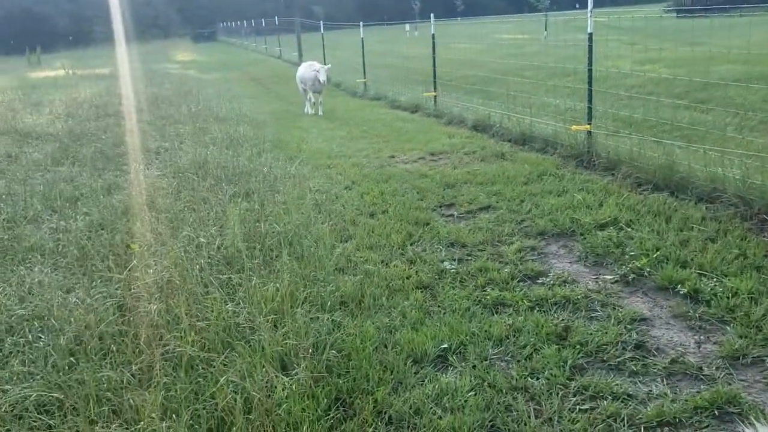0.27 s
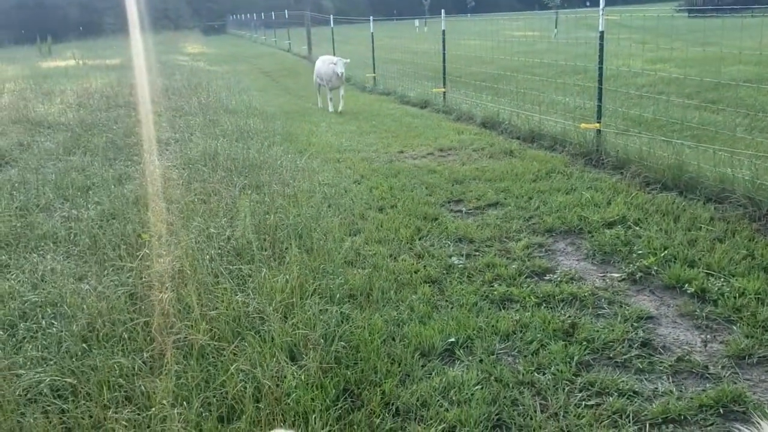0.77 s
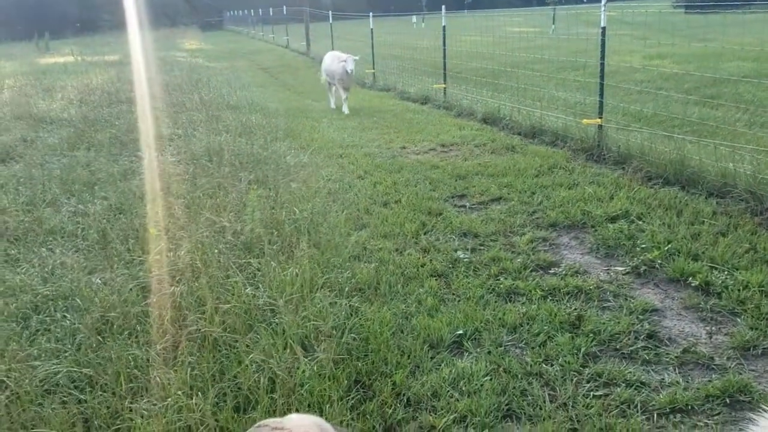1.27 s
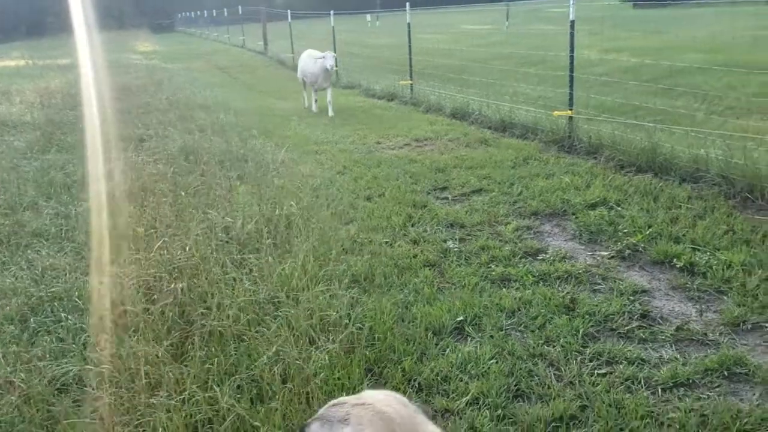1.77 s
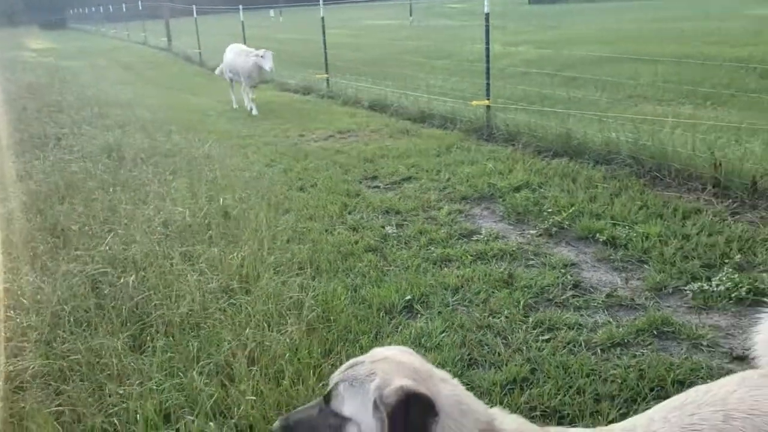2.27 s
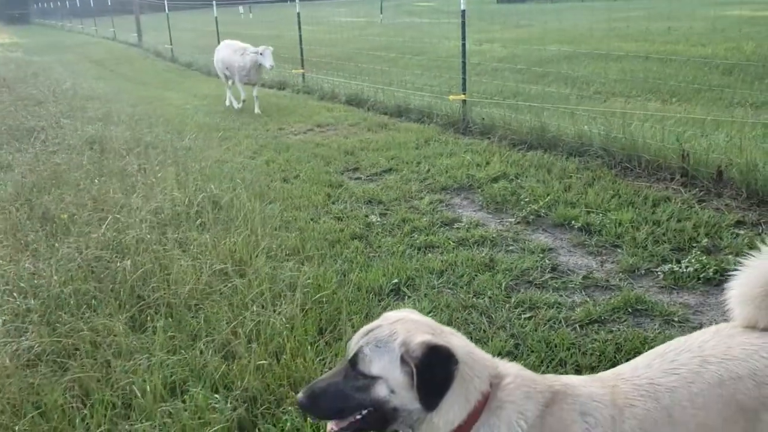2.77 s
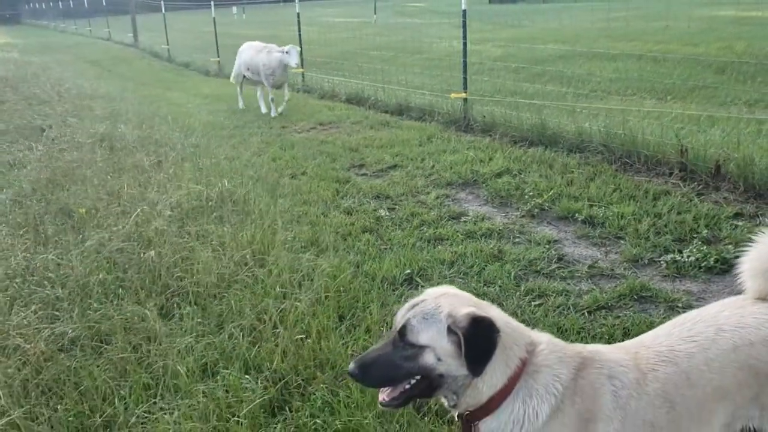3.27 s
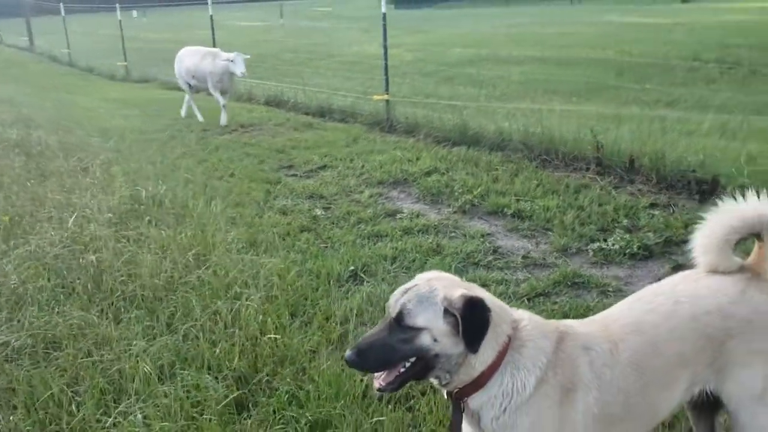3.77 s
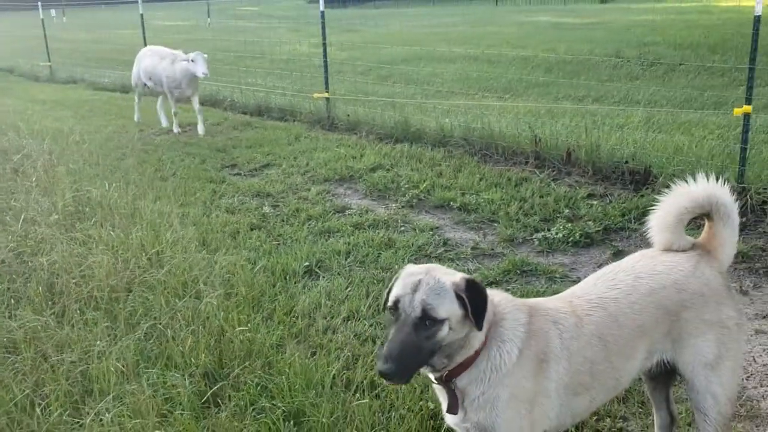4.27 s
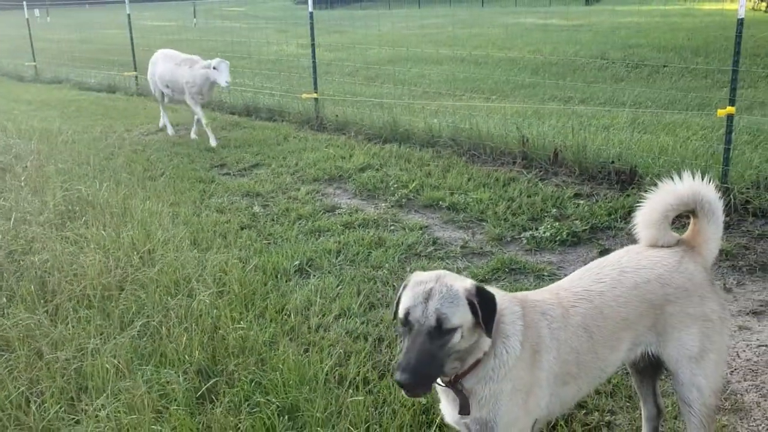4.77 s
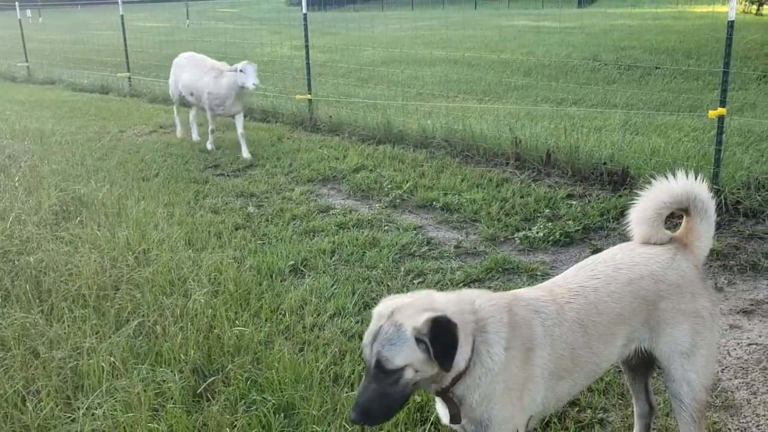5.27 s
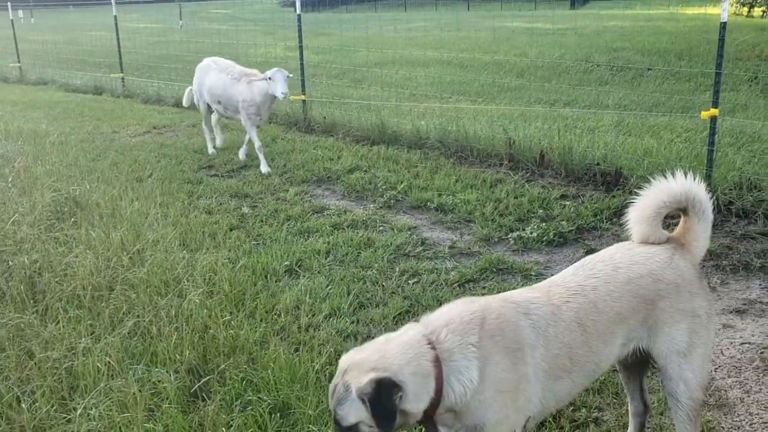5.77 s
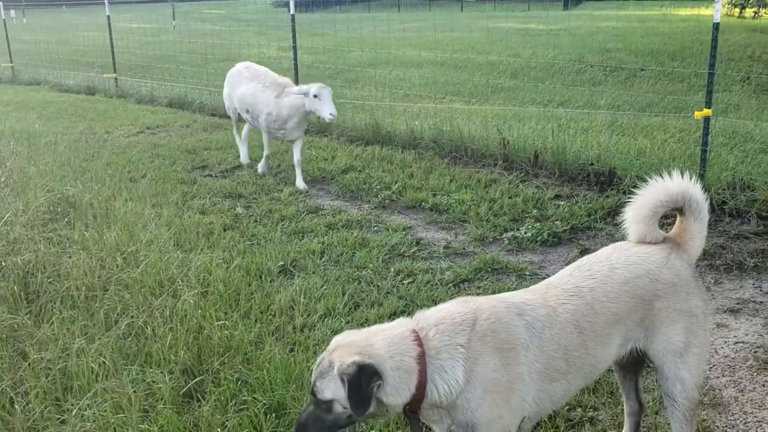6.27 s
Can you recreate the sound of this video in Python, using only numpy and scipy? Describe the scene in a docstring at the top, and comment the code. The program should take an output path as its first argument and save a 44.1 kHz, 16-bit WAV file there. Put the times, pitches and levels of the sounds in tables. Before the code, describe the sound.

An animal's quick steps crunch through damp pasture grass close on the right while wind rumbles unevenly on a hand-held microphone and insects hiss faintly.

```python
"""A pasture on a summer day. An animal close on the right crunches through damp grass, nearly three steps
a second: breaking stems ring, thud and crackle; long stems swish, wet ones squeak, dry blades snap.
Eddies of wind and low thumps of gusts and the grip rumble unevenly on the two ports of a hand-held
microphone. Insects scrape resonant wings, small birds chirp in gliding tones, and filtered noise makes the
rustle, the hiss of an insect chorus and the murmur of a far engine, whose wavering tones hum."""
import sys
import numpy as np
from scipy import signal
from scipy.fft import rfft, irfft, next_fast_len
from scipy.io import wavfile
from scipy.ndimage import uniform_filter1d

SR = 44100
rng = np.random.default_rng(int(sys.argv[2]) if len(sys.argv) > 2 else 0)


def pcm_store(signal):
    """Save signal as 16-bit PCM."""
    levels = np.round(np.clip(np.atleast_2d(signal), -1, 1) * 32767)
    wavfile.write(sys.argv[1], SR, levels.astype(np.int16).T)


N = 287091
T = np.arange(N) / SR

# In the tables, a level is relative where its function adds a trim; balance is left minus right.
# Loud crunches: (time [s], relative ring level [dB], ring frequency [Hz], relative thud level [dB],
# nominal length [s])
LOUD_CRUNCHES = [(0.026, -47, 600, -56, 0.0061), (0.119, -47, 3770, -57, 0.014),
                 (0.142, -51, 2070, -62, 0.019), (0.351, -51, 1500, -70, 0.0082),
                 (0.378, -46, 630, -61, .016), (0.384, -46.5, 2420, -68, 0.011),
                 (0.431, -51, 1890, -66, .02), (0.64, -54, 2050, -72, .009),
                 (0.465, -48, 1870, -69, 0.0076), (0.477, -44, 644, -67, 0.0084),
                 (0.509, -51, 651, -54, 0.014), (0.688, -44.5, 2130, -53, 0.014),
                 (0.708, -43, 1830, -53.5, .009), (0.755, -48, 586, -56, .014),
                 (0.816, -38.5, 583, -57, 0.011), (0.83, -55, 4400, -72, .008),
                 (1.048, -45, 2260, -73, 0.016), (1.072, -42, 1600, -48.5, .012),
                 (1.095, -54, 1950, -68, .012), (1.122, -46, 1210, -63, .015),
                 (1.163, -45.5, 2140, -70, 0.0063), (1.194, -44.5, 620, -63, 0.0069),
                 (1.429, -50.5, 2280, -58, 0.01), (1.449, -41, 714, -45, 0.0079),
                 (1.497, -50, 703, -65, 0.023), (1.513, -47, 2120, -73, .012),
                 (1.557, -48, 2320, -58, 0.018), (1.808, -46, 2130, -54.5, 0.012),
                 (1.826, -52, 690, -68, 0.013), (1.986, -54, 2700, -54, 0.012),
                 (2.124, -55, 1930, -71, .013), (2.17, -57.5, 4070, -64, .008),
                 (2.198, -45, 750, -64, 0.0085), (2.222, -43, 596, -67, 0.0055),
                 (2.596, -53, 2620, -75, 0.0097), (3.176, -44, 3020, -56, .01),
                 (3.416, -47.5, 1960, -61, 0.029), (3.462, -50, 2150, -72, .006),
                 (3.54, -46.5, 3400, -52.5, 0.011), (3.56, -51, 710, -55.5, 0.016),
                 (3.780, -38.5, 1850, -60, 0.016), (3.804, -42, 1940, -66, .009),
                 (3.837, -48, 1880, -67, 0.025), (3.867, -45, 2990, -60, 0.01),
                 (3.923, -47.5, 1740, -57.5, 0.011), (4.12, -41, 1920, -55.5, 0.011),
                 (4.127, -44, 3700, -61, .008), (4.248, -50.5, 1920, -62, 0.009),
                 (4.456, -49.5, 1730, -70, 0.025), (4.789, -46.5, 1880, -60, 0.018),
                 (4.802, -53, 1050, -68, .025), (4.847, -43, 3190, -66, 0.018),
                 (5.198, -49, 2120, -72, 0.015), (5.212, -44, 1760, -55, 0.0098),
                 (5.289, -46.5, 1850, -67, 0.014), (5.353, -52.5, 805, -64, 0.013),
                 (5.544, -45.5, 2120, -76, .019), (5.679, -47, 3100, -56, .018),
                 (5.908, -43, 2140, -73, .014), (5.932, -45, 1880, -59.5, .012),
                 (6.056, -52, 1970, -68, .014), (6.258, -46, 1950, -59, 0.0074)]
# Two spells of even walking: (first step [s], last step [s], step period [s])
WALKING_SPELLS = [(0.0, 1.82, .364), (3.41, 6.27, .356)]
# Extra delay of the crunches at the left port: (time [s], delay [samples])
LEFT_PORT_DELAY = [(0, 21), (1.9, 20), (4, 17), (6.5, 16)]
# Spectrum of crackling fibres: (frequency [Hz], relative level per Hz [dB])
CRACKLE_SPECTRUM = [(900, 4), (1500, 0), (2100, 1), (2600, -5), (3300, 6.5), (4500, -2), (7000, -6.5),
                    (10000, -20), (15000, -11)]
# Spectrum of the turf's thud: (frequency [Hz], relative level per Hz [dB])
THUD_SPECTRUM = [(250, -6), (480, 2.5), (700, -1.5), (1300, 4), (2000, -13.5), (3500, -22)]
# Wet stems squeaking: (time [s], level [dB], frequency [Hz], nominal length [s])
STEM_SQUEAKS = [(3.788, -64.5, 5490, 0.0064), (3.83, -70, 5400, 0.0087)]
# Long grass swishing: (time [s], length [s], relative level [dB], balance [dB])
GRASS_SWISHES = [(1.039, 0.28, -62, 1), (1.411, 0.21, -65.5, 2), (2.174, 0.4, -64.5, 1),
                 (3.052, .36, -55, -2), (3.42, 0.27, -66.5, 3)]
# Spectrum of a swish: (frequency [Hz], relative level per Hz [dB])
SWISH_SPECTRUM = [(300, 12), (550, 9.5), (1200, 4), (2200, 1.5), (3300, 2), (5000, -5.5), (7500, -5.5),
                  (10000, -10), (13000, -1), (15500, 4.5)]
# Dry blades snapping: (time [s], relative level [dB], nominal length [s], balance [dB])
BLADE_SNAPS = [(0.4993, -43, 0.01, 7.5), (0.513, -42, 0.01, 8), (0.758, -36, 0.0089, 8),
               (0.7774, -40, 0.01, 8), (2.3087, -43, 0.006, 3.5), (4.32, -41, 0.01, 1),
               (4.984, -43, 0.005, 5.5), (5.212, -41, 0.01, 4), (5.446, -41, 0.01, -1),
               (5.68, -38, 0.01, 3), (6.082, -42, 0.01, 9), (6.289, -29, 0.0036, -1)]
# Spectrum of a snap: (frequency [Hz], relative level per Hz [dB])
SNAP_SPECTRUM = [(5500, -13), (8000, -8), (11500, 5), (15500, 4.5)]
# Wind on the ports: (time [s], relative level [dB], balance [dB])
WIND_GUSTS = [(0.0, -36.5, 14), (0.11, -31, -11), (0.18, -50, -1), (0.27, -32.5, -10), (0.33, -54, 0),
              (0.36, -38, 14), (0.45, -50.5, 10), (1.32, -55, 0), (1.43, -41, 14), (1.74, -33, 20),
              (1.81, -42.5, -7), (1.9, -35.5, 14), (1.98, -38, -1.5), (2.05, -31.5, 16), (2.17, -32, 6),
              (2.23, -31.5, 15.0), (2.37, -35, -4.5), (2.5, -38, 9), (2.61, -33, -5), (3.24, -50, 12),
              (3.46, -56.5, 5), (3.62, -40.5, 20.0), (3.73, -55.5, -2.5), (3.99, -39, 10.5),
              (4.19, -37.5, 2), (4.22, -54, 4), (4.33, -44.5, -16.0), (4.41, -43.5, 5), (4.5, -53, -6.5),
              (4.57, -35, 22.5), (4.71, -40, -1), (4.86, -41.5, 16), (4.97, -35, -5), (5.0, -56, -4.0),
              (5.35, -48.5, 9), (5.42, -31, 30), (5.49, -40, 9.0), (5.6, -35.5, 18.0), (5.75, -27.5, 6),
              (5.82, -27.5, 14), (5.91, -39.5, 0), (6.09, -41, 11.0), (6.46, -37, 8), (6.51, -53, -6)]
# Spectrum of the wind's eddies: (frequency [Hz], relative level per Hz [dB])
EDDY_SPECTRUM = [(20, -26.5), (48, 4), (72, 0.5), (122, -12), (175, -21.5), (240, -30.5), (300, -41.5),
                 (450, -51)]
# Low thumps of wind gusts and the grip: (time [s], relative level [dB], frequency [Hz], balance [dB])
LOW_THUMPS = [(0.074, -26.5, 64.3, -18), (0.252, -29.5, 77.7, -11), (0.361, -26.5, 61.3, 20),
              (1.665, -30, 60, 16), (2.01, -22, 66.6, 23), (2.101, -25.5, 90.3, 30), (2.2, -24.5, 58, 15),
              (2.374, -22, 86.5, -18), (2.84, -27.5, 68.5, 2), (3.619, -30.5, 60.3, 29),
              (4.563, -23, 61.8, 21.5), (4.947, -32, 64, 0), (5.636, -21.5, 66, 18), (5.763, -19, 65, 23),
              (6.131, -29, 73.3, 13)]
# Bird notes: (time [s], length [s], start frequency [Hz], end frequency [Hz], relative level [dB],
# overtone against fundamental [dB])
BIRD_NOTES = [(0.449, 0.13, 2600, 2960, -59.5, -40), (0.669, 0.03, 5730, 7600, -50.5, -24),
              (0.803, .018, 6450, 6200, -54, -30), (0.91, 0.14, 2500, 2900, -60.5, -40),
              (1.071, 0.017, 7100, 6500, -46.5, -30), (1.372, 0.14, 2510, 2940, -62, -45),
              (1.817, .06, 6750, 6950, -59, -5), (1.862, .055, 7000, 7040, -56, -14),
              (5.468, .06, 6800, 7000, -64, -8), (5.532, 0.053, 6900, 7250, -61, -5),
              (6.438, 0.034, 2560, 2570, -61.5, -40)]
# Soft rustle of the field: (time [s], level [dB])
RUSTLE_LEVEL = [(0, -59), (0.3, -62.5), (0.7, -60.5), (1.2, -58.5), (2.2, -60.5), (2.9, -61), (3.3, -59),
                (4.0, -59), (4.35, -62.5), (6.5, -61.5)]
# Spectrum of the rustle: (frequency [Hz], relative level per Hz [dB])
RUSTLE_SPECTRUM = [(300, 0.5), (500, -0.5), (800, -10.5), (1000, -1), (1400, -4), (2000, -0.5),
                   (2800, -1.5), (4000, -2), (5000, -6.5)]
# Spectrum of the insect chorus: (frequency [Hz], relative level per Hz [dB])
CHORUS_SPECTRUM = [(4300, -49), (4970, -9.5), (5500, -3.5), (6010, 0.5), (6850, -8), (7340, -7),
                   (8400, -7.5), (8860, -17.5), (9440, -17), (12900, -11.5), (14800, -8.5), (15800, -10)]
# Balance of rustle and chorus: (frequency [Hz], balance [dB])
BACKGROUND_BALANCE = [(300, 7.5), (1300, 0), (2400, -3.5), (4400, -2.5), (6000, 4), (8200, 4.5),
                      (10000, 1.5), (12000, 1.5), (15000, 12)]
# A far engine growing fainter overall: (time [s], relative level [dB])
ENGINE_LEVEL = [(0, 2), (1.3, 2.5), (3.3, -1), (4.6, -6), (6.5, -5.5)]
# Tones of the engine's hum: (frequency [Hz], relative level [dB])
ENGINE_TONES = [(64.6, -51), (113.0, -55.5)]
# Spectrum of the engine's murmur: (frequency [Hz], relative level per Hz [dB])
MURMUR_SPECTRUM = [(35, 4.5), (65, 0), (120, -2), (170, -12.5), (240, -12), (420, -17.5), (600, -28),
                   (750, -28), (1000, -29)]

# Relative crackle level at a ring of -45 dB, dB gained per dB of ring, and fade as the animal walks on
CRACKLE_DB, CRACKLE_GROWTH, CRACKLE_FADE_DB_PER_S = -53, 0.11, 0.76
# Faint crunches: time a foot bears down, relative ring level and its spread, thud and crackle against it
STANCE_S, FAINT_DB, FAINT_SPREAD_DB, FAINT_THUD_DB, FAINT_CRACKLE_DB = 0.14, -58, 1.5, -8, -1.5
FAINT_HZ, FAINT_SPREAD_OCTAVES, FAINT_S = 1920, 0.476, 0.013
SCATTER_DB = -7  # gain of the sound scattered by the grass
WIND_TRIM_DB, FLUTTER_DB, FLUTTER_PER_S = 2.5, 2.5, 20  # flutter: spread and changes per second
CHORUS_DB = -58.5
# Katydid: first buzz, time to the next, shortening of each interval, length of a buzz
BUZZ_FIRST_S, BUZZ_PERIOD_S, BUZZ_HASTE_S, BUZZ_S = 0.254, 0.388, 0.0035, 0.13
BUZZ_DB, BUZZ_LOUDEST_S, BUZZ_FADE_DB_PER_S = -71.5, 3.5, 1.4
TRILL_DEPTH = 1.2  # exponent of the trill's wing strokes
TOP_HZ = 15800


def undb(db):
    """Amplitude gain is ten to the power of decibels over twenty."""
    return 10 ** (np.asarray(db) / 20)


def unit(x):
    """Dividing by the root mean square sets the mean power to 1."""
    return x / np.sqrt(np.mean(x ** 2) + 1e-24)


def curves(table):
    """Linear interpolation reads each column of a timed table sample by sample."""
    s, *columns = np.transpose(table)
    return [np.interp(T, s, column) for column in columns]


def sides(balance_db):
    """A level difference places a sound: left and right gains with a mean power of 1."""
    gains = undb(np.array([balance_db, -balance_db]).reshape(2, -1) / 2)
    return gains / np.sqrt(np.mean(gains ** 2, axis=0))


def along(points, f):
    """Spectra are interpolated on a logarithmic frequency axis."""
    hz, value = np.transpose(points)
    return np.interp(np.log(f + 1), np.log(hz), value)


def colour(x, points, balance=None):
    """Linear filtering multiplies the spectrum; it falls steeply beyond the end points, at rms 1."""
    size = next_fast_len(x.shape[-1])
    f = np.fft.rfftfreq(size, 1 / SR)
    low_skirt = np.minimum(f / points[0][0], 1) ** 4
    high_skirt = np.minimum(points[-1][0] / (f + 1), 1) ** 8
    gain = undb(along(points, f)) * low_skirt * high_skirt
    if balance is not None:
        gain = gain * sides(along(balance, f))
    return unit(irfft(rfft(x, size) * gain, size)[..., :x.shape[-1]])


def resonate(x, hz, q):
    """A single resonance selects a band as narrow as its quality factor is high, at rms 1."""
    b, a = signal.iirpeak(min(hz, 0.45 * SR), max(q, 1), SR)
    return unit(signal.lfilter(b, a, x))


def walk(rate):
    """Smoothed random steps make a slow fluctuation with a spread near 1."""
    hold = int(SR / rate)
    held = np.repeat(rng.standard_normal(N // hold + 1), hold)
    return unit(uniform_filter1d(held, hold)[:N])


def add(out, s, x):
    """Superposition: sounds sum, each from its own starting time."""
    i = max(int(s * SR), 0)
    out[..., i:i + x.shape[-1]] += x[..., :max(N - i, 0)]


def fractures(length, share, size=4096):
    """Fracture noise: many tiny breaks, strong in a share of the samples, build up and die away."""
    u = np.arange(size) / SR / max(length, 0.001)
    breaks = rng.standard_normal(size) * (0.1 + (rng.random(size) < share))
    return breaks * u ** 0.5 * np.exp(-u ** 2)


def crunch(ring_db, hz, thud_db, crackle_db, length):
    """Fracture excites three responses: the damp tuft rings, the turf thuds, the fibres crackle."""
    ring = resonate(resonate(fractures(length * 0.75, 0.045), hz, 9.1), hz, 1.4)
    thud = colour(fractures(length * 1.14, 0.055), THUD_SPECTRUM)
    crackle = colour(fractures(length * 1.53, 0.016), CRACKLE_SPECTRUM)
    return undb(ring_db - 16.0) * ring + undb(thud_db - 6.5) * thud + undb(crackle_db - 10.5) * crackle


def loud_crunches():
    """Crackle grows with the ring and fades as the animal walks on."""
    for s, ring_db, hz, thud_db, length in LOUD_CRUNCHES:
        crackle_db = CRACKLE_DB + CRACKLE_GROWTH * (ring_db + 45) - CRACKLE_FADE_DB_PER_S * s
        yield s, ring_db, hz, thud_db, crackle_db, length


def faint_crunches(count):
    """Progressive failure: each footfall crushes a few more stems at chance moments as it bears down."""
    for first, last, period in WALKING_SPELLS:
        for step in np.arange(first, last + period / 2, period):
            for k in range(count):
                late = (k + rng.random()) / count * STANCE_S
                strength, pitch = rng.standard_normal(2)
                db = FAINT_DB + FAINT_SPREAD_DB * strength
                hz = FAINT_HZ * 2 ** (FAINT_SPREAD_OCTAVES * pitch)
                yield step + late, db, hz, db + FAINT_THUD_DB, db + FAINT_CRACKLE_DB, FAINT_S


def steps():
    """Time of arrival gives direction: the right port leads; the grass scatters sound to both."""
    direct = np.zeros((2, N))
    delay_s, delay_samples = np.transpose(LEFT_PORT_DELAY)
    for s, *settings in [*loud_crunches(), *faint_crunches(count=3)]:
        x = crunch(*settings)
        left_delay = np.interp(s, delay_s, delay_samples) / SR
        add(direct[0], s + left_delay, x * undb(2.0))
        add(direct[1], s, x)
    t = np.arange(SR // 5) / SR
    scatter = rng.standard_normal((2, len(t))) * np.exp(-t / 0.028)
    scatter /= np.sqrt(np.sum(scatter ** 2, axis=1, keepdims=True))  # unit energy
    return direct + undb(SCATTER_DB) * signal.fftconvolve(direct, scatter, axes=1)[:, :N]


def squeaks():
    """Friction excites resonance: wet stems slip on each other and ring high for a moment."""
    out = np.zeros((2, N))
    for s, db, hz, length in STEM_SQUEAKS:
        slip = fractures(length, 0.11)
        add(out, s, undb(db) * resonate(resonate(slip, hz, 13), hz, 9.2))
    return out


def swishes():
    """Friction noise: many sliding stems make a grainy brush that swells, eases and differs by port."""
    out = np.zeros((2, N))
    for s, length, db, balance_db in GRASS_SWISHES:
        size = int(length * SR)
        grain_db = 2.5 * rng.standard_normal((2, size)) + 1.9 * walk(64.7)[:size]
        rub = rng.standard_normal((2, size)) * undb(grain_db)
        pressure = np.interp(np.linspace(0, 1, size), [0, 0.25, 0.7, 1], [0.13, 0.95, 0.69, 0.079])
        add(out, s, colour(rub, SWISH_SPECTRUM) * pressure * undb(db + 6.5) * sides(balance_db))
    return out


def blades():
    """Brittle fracture is brief and bright: dry blades snap with a thin tick."""
    out = np.zeros((2, N))
    for s, db, length, balance_db in BLADE_SNAPS:
        breaks = np.array([fractures(length * 1.4, 0.048) for _ in range(2)])
        add(out, s, colour(breaks, SNAP_SPECTRUM) * undb(db - 28.0) * sides(balance_db))
    return out


def wind():
    """Turbulent pressure: eddies buffet each port on its own; gusts set their strength and flutter."""
    gust_db, balance_db = curves(WIND_GUSTS)
    eddies = colour(rng.standard_normal((2, N)), EDDY_SPECTRUM)
    # dividing by the local strength leaves the level to the gusts
    strength = np.sqrt(uniform_filter1d(eddies ** 2, size=1800, axis=1) + 1e-4)
    flutter_db = FLUTTER_DB * np.array([walk(FLUTTER_PER_S) for _ in range(2)])
    return eddies / strength * undb(gust_db + WIND_TRIM_DB + flutter_db) * sides(balance_db)


def thumps():
    """Damped oscillation: a gust or the grip sets off a few low cycles."""
    out = np.zeros((2, N))
    t = np.arange(SR // 4) / SR
    swell = t / 0.005 * np.exp(1 - t / 0.0099)
    for s, db, hz, balance_db in LOW_THUMPS:
        upper_tone = np.sin(2 * np.pi * (1.864 * hz * t + rng.random()))
        cycles = np.sin(2 * np.pi * hz * t) + 0.32 * upper_tone
        add(out, s, undb(db - 6.0) * swell * cycles * sides(balance_db))
    return out


def wing_strokes(hz, q, rate_hz, depth):
    """Stridulation: quick scraping strokes modulate the amplitude of a wing resonance."""
    phase = 2 * np.pi * np.cumsum(rate_hz * (1 + 0.03 * walk(5.8))) / SR
    stroke = np.exp(depth * np.sin(phase))
    wing = resonate(resonate(rng.standard_normal((2, N)), hz, q), hz, q)
    return unit(wing * stroke)


def insects(intervals):
    """Gated stridulation: a katydid buzzes in bursts; a second insect trills and then fades."""
    gate = np.zeros(N)
    gaps = BUZZ_PERIOD_S - BUZZ_HASTE_S * np.arange(intervals)
    for s in BUZZ_FIRST_S + np.cumsum([0, *gaps]):
        db = BUZZ_DB - BUZZ_FADE_DB_PER_S * abs(s - BUZZ_LOUDEST_S)
        add(gate, s, undb(db) * signal.windows.tukey(int(BUZZ_S * SR), 0.3))
    buzz = wing_strokes(9080, 31, 78, depth=0.59) * gate * sides(2.4)
    fade = np.interp(T, [1.6, 2.1], [1, 0])
    trill = wing_strokes(8150, 12, 59.2, depth=TRILL_DEPTH) * fade * undb(-69) * sides(14)
    return buzz + trill


def birds():
    """Frequency modulation: thin notes glide and level off; the air makes them flutter."""
    out = np.zeros((2, N))
    for s, length, start_hz, end_hz, db, overtone_db in BIRD_NOTES:
        u = np.linspace(0, 1, int(max(length, 0.005) * SR))
        glide_hz = end_hz + (start_hz - end_hz) * (1 - u) ** 2
        hz = glide_hz * (1 + 0.014 * walk(246)[:len(u)])
        phase = 2 * np.pi * np.cumsum(hz) / SR
        tone = np.sin(phase) + undb(overtone_db) * np.sin(2 * phase)
        note = tone * np.sin(np.pi * u)
        flutter_db = 3.4 * walk(170)[:len(u)]
        add(out, s, undb(db - 1.5 + flutter_db) * note * sides(5.7))
    return out


def engine():
    """Partly coherent noise murmurs from afar, beneath low tones of wavering frequency."""
    far_db, = curves(ENGINE_LEVEL)
    # one noise shared by both ports, with a little of each port's own
    noise = rng.standard_normal(N) + 0.24 * rng.standard_normal((2, N))
    out = colour(noise, MURMUR_SPECTRUM) * undb(-53.5 + 0.51 * far_db)
    for hz, db in ENGINE_TONES:
        phase = 2 * np.pi * np.cumsum(hz * (1 + 0.01956 * walk(14))) / SR
        out += undb(db + 1.5 + far_db) * np.sin(phase)
    return out


def field():
    """Many small sources sum to noise: a soft rustle and the hiss of an insect chorus."""
    rustle_db, = curves(RUSTLE_LEVEL)
    rustle = colour(rng.standard_normal((2, N)), RUSTLE_SPECTRUM, BACKGROUND_BALANCE)
    chorus = colour(rng.standard_normal((2, N)), CHORUS_SPECTRUM, BACKGROUND_BALANCE)
    return rustle * undb(rustle_db + 0.5 * walk(14)) + chorus * undb(CHORUS_DB + 0.52 * walk(50))


def scene():
    """Superposition of everything that reaches the two ports."""
    animal = steps() + squeaks() + swishes() + blades()
    rumble = wind() + thumps()
    return animal + rumble + insects(intervals=17) + birds() + engine() + field()


def record(dry):
    """Band limiting: the recorder cuts the deepest rumble and the top."""
    high_pass = signal.butter(2, 31, "high", fs=SR, output="sos")
    low_pass = signal.ellip(12, 0.2, 80, TOP_HZ, fs=SR, output="sos")
    return signal.sosfilt(low_pass, signal.sosfiltfilt(high_pass, dry))


dry = scene()
out = record(dry)
pcm_store(out)
```